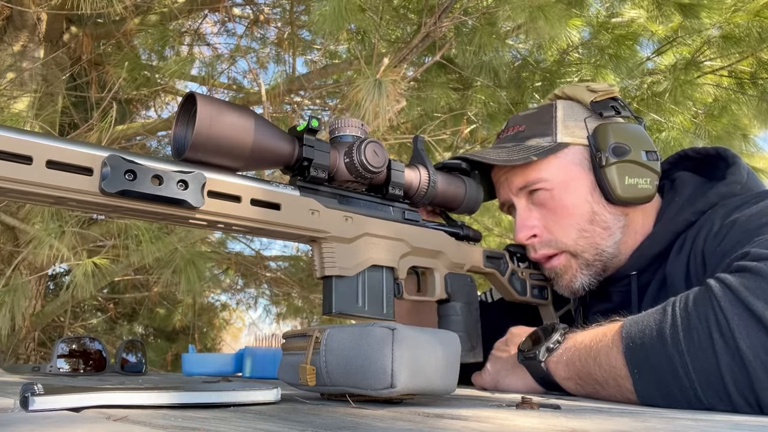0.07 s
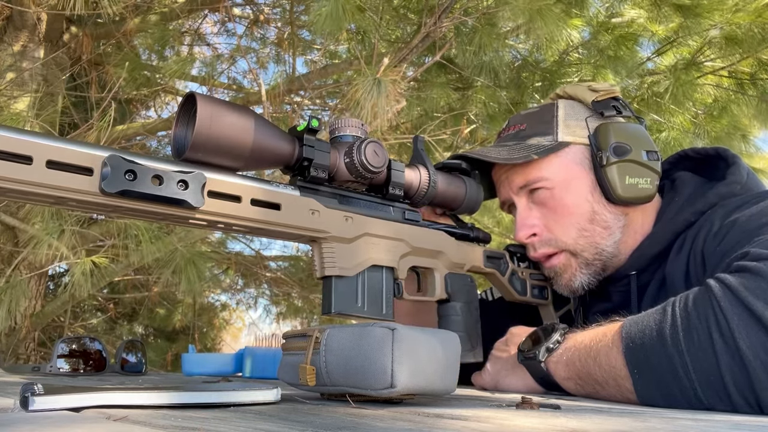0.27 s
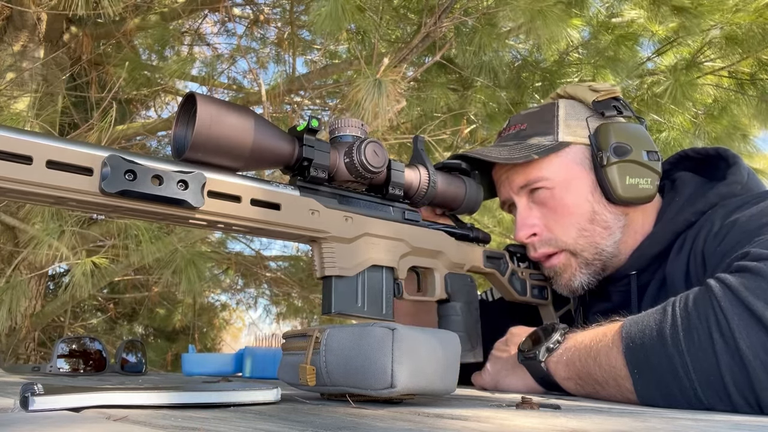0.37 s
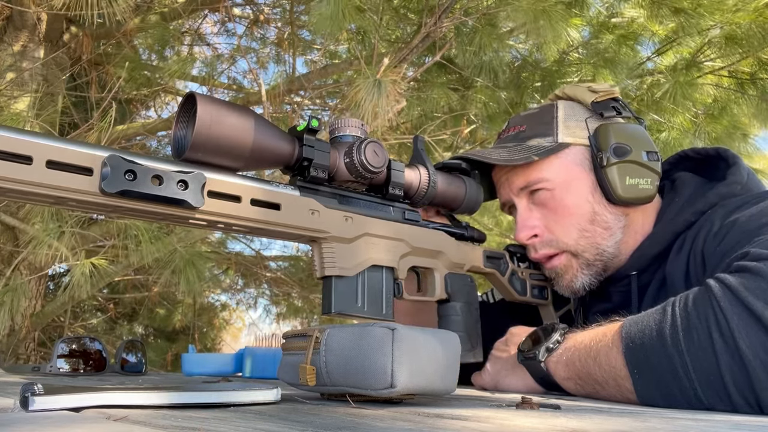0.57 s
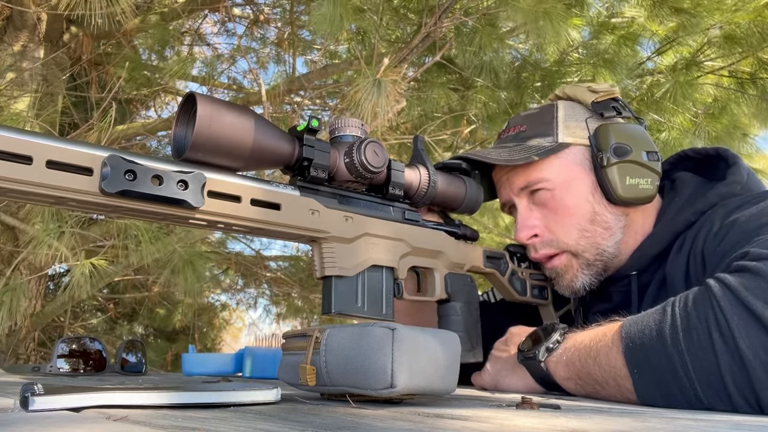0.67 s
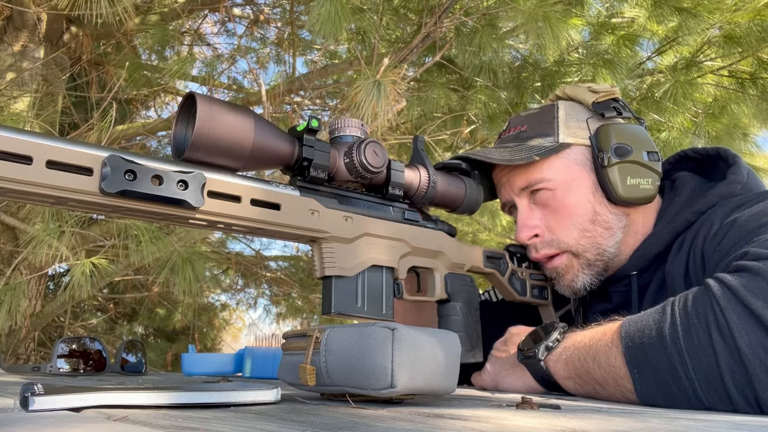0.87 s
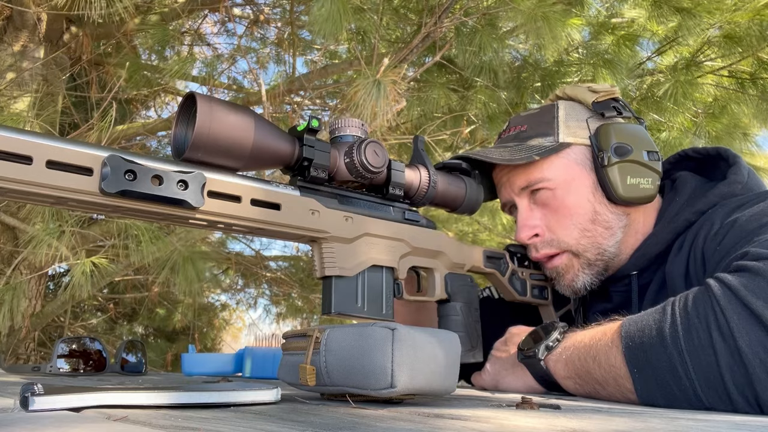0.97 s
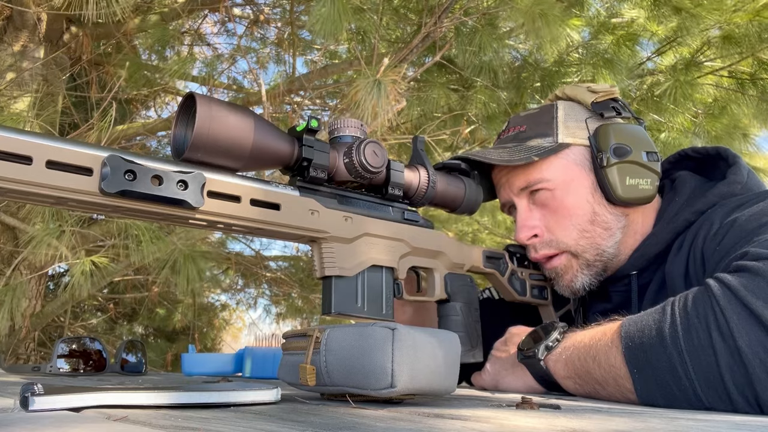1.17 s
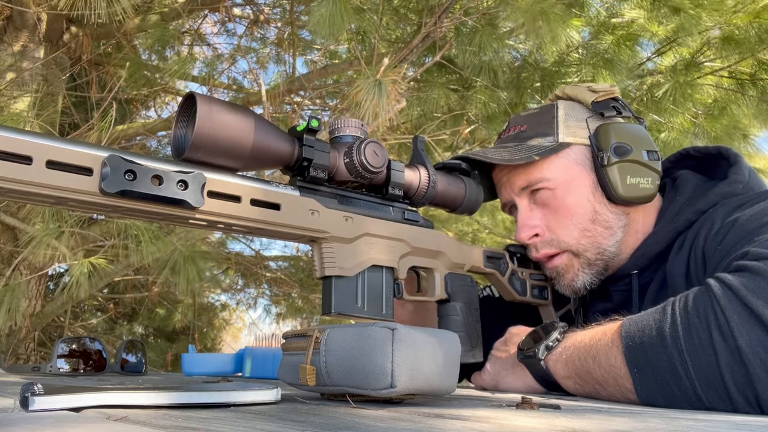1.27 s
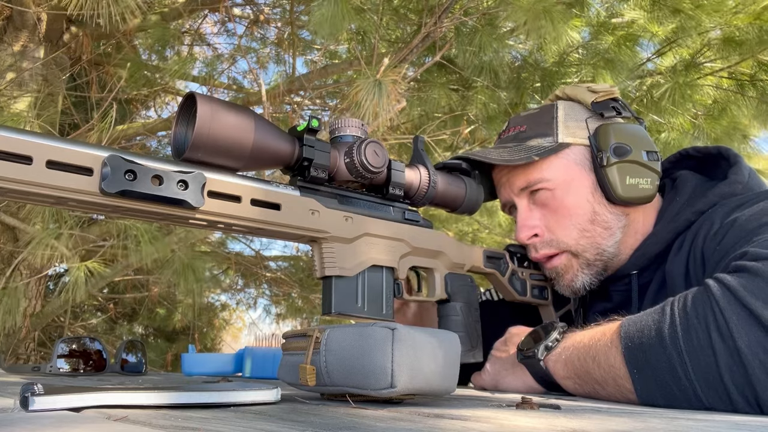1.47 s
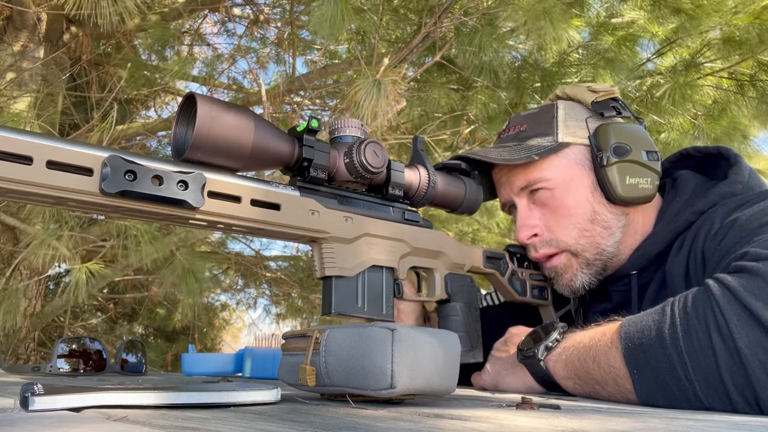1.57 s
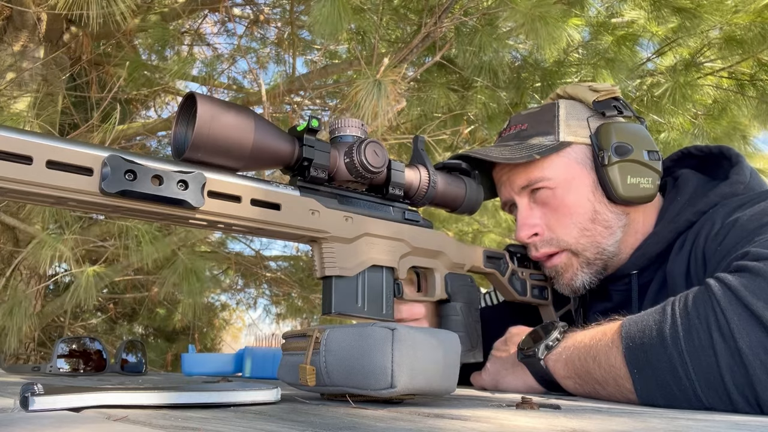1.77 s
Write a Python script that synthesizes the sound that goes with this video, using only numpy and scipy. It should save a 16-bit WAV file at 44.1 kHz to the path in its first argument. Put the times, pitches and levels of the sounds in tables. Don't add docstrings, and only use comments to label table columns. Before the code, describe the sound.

Rifle bolt action cycled up close: handle up, bolt back, pushed home, locked with a knock

```python
import sys
import numpy as np
from scipy import signal
from scipy.fft import rfft, irfft, next_fast_len
from scipy.io import wavfile

SR = 44100
rng = np.random.default_rng(int(sys.argv[2]) if len(sys.argv) > 2 else 0)


def volts_from_db(level):
    exponent = np.asarray(level, float) / 20
    return 10 ** exponent


def to_wav(s):
    ch = np.atleast_2d(s).T
    pcm = np.round(np.clip(ch, -1, 1) * 32767)
    wavfile.write(sys.argv[1], SR, pcm.astype(np.int16))


N = 81585

# time in seconds, stock peak in dB, steel peak in dB, flurry length in seconds, stock pitch in Hz.
LIFT_BLOWS = [
    (.122, -53, -73, 0.0018, 780),
    (.2165, -27.5, -13, 0.0027, 850),
    (.2215, -9.5, -6.5, 0.0044, 872),
]
CAM_BLOWS = [
    (.2655, -20, -8.5, 0.0047, 874),
    (.278, -22.5, -27, 0.0036, 911),
    (.337, -46.5, -47, 0.0009, 896),
]
DRAW_BLOWS = [
    (.532, -56.5, -69.5, 0.0035, 910),
    (.5965, -68, -39, 0.0037, 801),
    (.6325, -40, -18, 0.0059, 752),
    (.646, -32, -44, 0.0033, 798),
    (.684, -39.5, -61, 0.0013, 904),
    (.697, -43, -51, 0.0014, 930),
    (.767, -35.5, -41, 0.0025, 877),
]
STOP_BLOWS = [(.852, -20.5, -12.5, .003, 958), (.871, -19, -6, 0.0051, 952),
              (.881, -26.5, -13.5, 0.0041, 792), (.8895, -28.5, -19.5, 0.0052, 900),
              (.899, -36, -19, 0.003, 740), (.922, -56, -28, 0.0043, 800), (.941, -55, -29, .003, 880),
              (.952, -43.5, -23, .011, 763), (1.004, -55, -25.5, 0.0023, 844),
              (1.021, -31.5, -23.5, 0.0083, 829), (1.121, -45.5, -42.5, 0.0032, 866),
              (1.255, -50.5, -62, 0.0035, 800)]
PUSH_BLOWS = [
    (1.363, -42.5, -45.5, 0.0026, 780),
    (1.3745, -21.5, -6, 0.0032, 854),
    (1.387, -34.5, -34, 0.0044, 843),
    (1.396, -32.5, -38.5, .005, 786),
    (1.4245, -57, -17, 0.0034, 810),
]
LOCK_BLOWS = [
    (1.578, -17.5, -20, 0.00758, 883.6),
]
# pitch in Hz, level in dB, time to fall 60 dB in seconds.
LIFT_STEEL = [(1724, -11.5, 0.09), (2047, -13, 0.045), (3430, 1, 0.24), (3340, -1.5, 0.12),
              (3730, -5.5, 0.057), (5650, -10, 0.089), (6483, 0.5, 0.087), (10300, -11.5, 0.0067),
              (11900, -7.5, 0.032)]
# pitch in Hz, level in dB, time to fall 60 dB in seconds.
CAM_STEEL = [(1495, -2, 0.013), (1730, -7.5, .04), (2950, -3, 0.031), (3730, 0, 0.057), (5503, 4.5, 0.0067),
             (7000, 3.5, 0.0051), (9400, -7.5, 0.0083), (11650, 2.5, 0.015)]
# pitch in Hz, level in dB, time to fall 60 dB in seconds.
DRAW_STEEL = [(1474, -14, 0.0098), (1910, -17, 0.0051), (3300, -10, 0.051), (4040, -10.5, 0.04),
              (5000, -29, 0.02), (5780, 0.5, 0.046), (6230, -7, 0.15)]
# pitch in Hz, level in dB, time to fall 60 dB in seconds.
STOP_STEEL = [(1330, -13.5, 0.06), (1946, -5.5, .03), (2420, -24, .025), (3350, -3, 0.075),
              (3437, -0.5, 0.075), (4110, 2.5, 0.09), (5600, 2.5, 0.021), (7550, -3.5, 0.0043),
              (11020, -8, 0.0063)]
# pitch in Hz, level in dB, time to fall 60 dB in seconds.
PUSH_STEEL = [(1800, -2.5, .02), (3177, 7.5, 0.034), (4470, -21, 0.025), (5150, 5.5, 0.031),
              (6320, 8.5, 0.022), (6770, 6, 0.005), (9560, -5, .005), (11670, 1, 0.015)]
# pitch in Hz, level in dB, time to fall 60 dB in seconds.
LOCK_STEEL = [(1490, -20, 0.037), (2000, -13.5, 0.023), (3200, -1.5, 0.032), (4040, -0.5, 0.019),
              (5010, -2, .015), (6120, -6, 0.0092)]
# share of the blow's pitch, level in dB, time to fall 60 dB in seconds.
STOCK = [(.5, -24, .04), (.7, -14, .025), (.87, -9, .04), (1, 2, .06), (1.27, -14, .02)]
# frequency in Hz, level in dB per Hz.
CRACK = [(500, -38), (1200, -2.5), (3300, -4), (5500, 12), (8500, 1), (12000, -3.5), (14200, -15.5),
         (15600, -53)]
# start in seconds, level in dB, pitch
# in Hz, time to fall 60 dB in seconds.
RINGS = [(0.631, -10, 5780, 0.026), (1.373, -11, 3130, 0.012), (1.375, -19.5, 5350, 0.0089),
         (.218, -20.5, 3300, .03), (1.578, -28.5, 3200, 0.032), (.222, -25, 640, 0.023),
         (1.4253, -12, 3754, 0.0089), (1.4244, -28, 3200, 0.018), (.27, -50.5, 779, 0.43),
         (0.5945, -40.5, 1410, 0.027), (.697, -45.5, 1700, 0.013), (0.85, -15.5, 1300, 0.013),
         (.852, -25, 2000, 0.028), (0.87, -24, 2058, .03), (.875, -33.5, 580, 0.047),
         (1.374, -13, 1800, 0.012), (1.375, -28.5, 404, 0.09), (1.4242, -30, 1550, 0.0058),
         (1.578, -33.5, 409, 0.091), (.28, -41, 2920, 0.086), (0.771, -48.5, 1580, 0.05),
         (1.061, -65, 1295, 0.44),
         (.64, -44, 5830, .4),
    (1.378, -38, 2880, .12),
    (1.022, -52, 6200, .15),
    (.29, -46, 900, .25),
]
# start in seconds, end in seconds, level at start in dB, level at end in dB.
STROKES = [(0.191, 0.211, -62.5, -50), (0.221, 0.282, -40.5, -50), (0.261, 0.447, -42.5, -86.5),
           (0.48, 0.629, -89, -45.5), (0.64, 0.755, -55.5, -75.5), (0.755, 0.868, -62, -42.5),
           (0.854, 0.941, -33.5, -53), (0.932, 1.047, -45, -48), (1.009, 1.193, -51, -87.5),
           (1.338, 1.388, -76, -43), (1.369, 1.481, -42, -70.5), (1.468, 1.595, -66.5, -58),
           (1.561, 1.752, -54, -90), (1.785, 1.904, -84.5, -59.5)]
STROKE_CUT_HZ = [5000, 9000, 9020, 4550, 6960, 12000, 14000, 14000, 6720, 9040, 12000, 12400, 6950, 6190]
# frequency in Hz, level in dB per Hz.
SLIDE_COLOUR = [(200, -24.5), (400, -14), (800, 10), (1300, -4.5), (3300, -9.5), (6000, -5.5), (12000, -32),
                (15000, -26.5)]
# level in dB, time to fall 60 dB in seconds.
THUDS = [(-35.5, 0.36), (-22, 0.27), (-30, 0.22), (-30.5, 0.13), (-34.5, 0.215), (-39.5, 1), (-39.5, 0.23),
         (-27.5, 0.16), (-40, 0.6), (-28.5, 0.18), (-45, 0.18), (-36, 0.27), (-33.5, 0.416), (-35.5, 0.624),
         (-29.5, 0.24), (-38, 0.19), (-40.5, 0.18), (-38.5, 0.14), (-35.5, 0.027), (-42, 0.2),
         (-49.5, 0.21), (-46.5, 0.17), (-50.5, 0.17)]
THUD_S = [.23, .275, .268, .275, .38, .705, .72, .885, .84, 1.045, 1.05, 1.39, 1.39, 1.6, 1.585, 1.578,
          1.67, .32, .7, .95, 1.055, 1.61, .54]
THUD_HZ = [95, 101, 360, 160, 50, 97, 60, 100, 66, 66, 185, 186, 66, 62, 110, 200, 56, 300, 270, 330, 370,
           290, 330]
# start in seconds, length in seconds, level in dB, start pitch in Hz, fall in Hz.
WHISTLES = [
    (0, .03, -68, 2680, 250),
    (0, .15, -75, 2470, 10),
    (.44, .14, -76, 2460, 10),
    (.675, .04, -66, 2380, 10),
    (1.76, .11, -72, 3060, 1300),
]
# frequency in Hz, level in dB per Hz.
AIR = [(30, -26.5), (55, -8), (120, 0), (250, -20), (600, -29), (1300, -28.5), (2000, -40), (15000, -63.5)]

STAGES = [(LIFT_BLOWS, LIFT_STEEL), (CAM_BLOWS, CAM_STEEL), (DRAW_BLOWS, DRAW_STEEL),
          (STOP_BLOWS, STOP_STEEL), (PUSH_BLOWS, PUSH_STEEL), (LOCK_BLOWS, LOCK_STEEL)]
RISE_SHARE, CONTACTS_PER_S = 0.31, 6100
STRIKE_SPREAD_DB, STRIKE_DETUNE = 3, .008
GRIP_T60_S, GRIP_LEAVES_DB = .017, -13
TAIL_DB, TAIL_T60_S, TAIL_CUT_HZ = -19.5, 0.076, 6500
FAINT_CUT_HZ, CUT_DB_PER_OCTAVE = 2900, 10
STOCK_SWELL, STOCK_ROUGH = 0.58, .12
RUB_RING_DB, RUB_PER_S, JUDDER_DB = -2, 3100, 3.5
THUD_RISE_CYCLES, THUD_SIDE_DB, THUD_SAG, THUD_ROUGH = 0.73, -0.5, 0.022, .6
OVERTONE_DB, FALL_POWER = -17, 2.7
AIR_DB, GUST_DB, AIR_ALIKE = -57, 2, .5
PORT_LAG_S, PAN_DB, DIFFUSE_DB = 7e-5, 0.4, -8
RUMBLE_CUT_HZ, CUTOFF_HZ, TOP = 36, 16300, .88
OPPOSITE = np.array([[1], [-1]])


def rms_one(x):
    return x / np.sqrt(np.mean(x ** 2) + 1e-30)


def peak_one(x):
    return x / (np.max(np.abs(x)) + 1e-30)


def colour(x, points):
    hz, db = np.transpose(points)
    grid = np.log(np.arange(1, 514) * SR / 1026)
    ceps = irfft(np.interp(grid, np.log(hz), db) * np.log(10) / 20)
    ceps[1:512] *= 2
    ceps[513:] = 0
    response = irfft(np.exp(rfft(ceps)))
    response = response.reshape((1,) * (x.ndim - 1) + (-1,))
    return signal.fftconvolve(x, response, axes=-1)[..., :x.shape[-1]]


def ring(x, hz, t60):
    r = volts_from_db(-60 / (max(t60, .004) * SR))
    w = 2 * np.pi * hz / SR
    return signal.lfilter([0, np.sin(w)], [1, -2 * r * np.cos(w), r * r], x + 1e-18)


def body(x, modes, longest):
    out = np.zeros(len(x))
    for hz, db, t60 in modes:
        louder, sharper = rng.standard_normal(2)
        tone = ring(x, hz * (1 + STRIKE_DETUNE * sharper), min(t60, longest))
        out += volts_from_db(db + STRIKE_SPREAD_DB * louder) * peak_one(tone)
    return out


def stock_modes(pitch_hz):
    return [(share * pitch_hz, db, t60) for share, db, t60 in STOCK]


def grit(size, per_s, spread_db):
    chance, luck = rng.random((2, size))
    height = volts_from_db(-spread_db * np.log(np.maximum(luck, .02)))
    return (chance < per_s / SR) * height * rng.choice([-1, 1], size)


def add(out, s, x):
    i = int(s * SR)
    out[..., i:i + x.shape[-1]] += x[..., :out.shape[-1] - i]


def blow(steel, stock_db, bright_db, flurry, hz):
    t = np.arange(SR // 4) / SR
    rise = RISE_SHARE * flurry
    shape = np.where(t < rise, (t / rise) ** 0.97, np.exp(-(t - rise) / flurry * 1.5))
    hits = shape * (grit(len(t), CONTACTS_PER_S, 2.2) + .5 * rng.standard_normal(len(t)))
    choke = volts_from_db(-60 * np.maximum(t - rise - flurry, 0) / GRIP_T60_S) + volts_from_db(GRIP_LEAVES_DB)

    r = np.exp(-2 * np.pi * TAIL_CUT_HZ / SR)
    rattle = signal.lfilter([1 - r], [1, -r], rng.standard_normal(len(t)))
    tail = np.minimum(t / rise, 1) * volts_from_db(TAIL_DB - 60 * t / TAIL_T60_S) * rattle
    crack = peak_one(colour(peak_one(hits * shape) + tail, CRACK))
    bright = volts_from_db(-4) * peak_one(choke * body(hits, steel, .03)) + volts_from_db(-2) * crack

    cut_hz = min(FAINT_CUT_HZ * 2 ** ((bright_db + 48) / CUT_DB_PER_OCTAVE), .45 * SR)
    bright = signal.lfilter(*signal.butter(2, max(cut_hz, 1500), fs=SR), bright)

    swell = np.sin(np.pi / 2 * np.minimum(t / (rise + STOCK_SWELL * flurry), 1)) ** 2
    knock = np.r_[1., t[1:] * 0] + STOCK_ROUGH * peak_one(hits)
    stock = swell * choke * body(knock, stock_modes(hz), .08)
    return volts_from_db(bright_db) * bright + volts_from_db(stock_db) * peak_one(stock)


def blows():
    out = np.zeros(N)
    for rows, steel in STAGES:
        for s, stock_db, bright_db, flurry, hz in rows:
            add(out, s - RISE_SHARE * flurry, blow(steel, stock_db, bright_db, flurry, hz))
    out = signal.sosfilt(signal.butter(3, 420, "high", fs=SR, output="sos"), out)

    t = np.arange(SR // 4) / SR
    click = np.r_[1., t[1:] * 0]
    for s, db, hz, t60 in RINGS:
        add(out, s, volts_from_db(db) * ring(click, hz, t60) * np.minimum(t / 0.0019, 1))
    return out


def slide():
    t = np.arange(N) / SR
    points = N // 150 + 2
    judder = np.interp(np.arange(N) / 150, np.arange(points), rng.standard_normal(points))
    rub = grit(N, RUB_PER_S, 3.5) + .8 * rng.standard_normal(N)
    rub = rub * volts_from_db(JUDDER_DB * judder)
    steel = rms_one(body(rub, STOP_STEEL, .007))
    stock = rms_one(body(rub, stock_modes(850), .03))
    sound = rms_one(colour(rub, SLIDE_COLOUR)) + volts_from_db(RUB_RING_DB) * (.5 * steel + stock)

    out = np.zeros(N)
    for (start, end, db_start, db_end), cut_hz in zip(STROKES, STROKE_CUT_HZ):
        fade = np.clip(np.minimum(t - start, end - t) / .008, 0, 1)
        press = volts_from_db(np.interp(t, [start, end], [db_start, db_end])) * fade
        out += press * signal.lfilter(*signal.butter(2, cut_hz, fs=SR), sound)
    return out


def bench():
    out, t = np.zeros((2, N)), np.arange(SR // 2) / SR
    for s, hz, (db, t60) in zip(THUD_S, THUD_HZ, THUDS):
        a, b = rng.uniform(0, 2 * np.pi, 2)
        shape = volts_from_db(db - 60 * t / t60) * (1 - np.exp(-(t * hz / THUD_RISE_CYCLES) ** 2))
        rough = THUD_ROUGH * rng.standard_normal((2, 200))
        wobble = [np.interp(t * hz / 2, np.arange(200), v) for v in rough]
        w = 2 * np.pi * hz * np.cumsum(1 - THUD_SAG * t / t60 * 2) / SR
        shared = np.sin(w + a + wobble[0])
        side = volts_from_db(THUD_SIDE_DB) * np.sin(1.15 * w + b + wobble[1])
        add(out, s, shape * (shared + side * OPPOSITE))
    return out


def birds():
    out = np.zeros(N)
    for s, length, db, hz, fall_hz in WHISTLES:
        u = np.arange(int(length * SR)) / (length * SR)
        w = 2 * np.pi * np.cumsum(hz - fall_hz * u ** FALL_POWER) / SR
        tone = np.sin(w) + volts_from_db(OVERTONE_DB) * np.sin(2 * w)
        add(out, s, volts_from_db(db) * np.sin(np.pi * u) ** 0.057 * tone)
    return out


def air():
    mid, side = rms_one(colour(rng.standard_normal((2, N + 2000)), AIR)[:, 2000:])
    gust = signal.lfilter([1], [1, -1.6, .64], rng.standard_normal(N // 400 + 60))
    gust = rms_one(gust[50:])
    gust = np.interp(np.arange(N) / 400, np.arange(len(gust)), gust)
    noise = np.sqrt(1 + AIR_ALIKE) * mid + np.sqrt(1 - AIR_ALIKE) * side * OPPOSITE
    return volts_from_db(AIR_DB + GUST_DB * gust) * noise


def ports(x):
    size = next_fast_len(N + 4096)
    turns = np.arange(size // 2 + 1) / size * SR * PORT_LAG_S
    late = irfft(rfft(x, size) * np.exp(-2j * np.pi * turns), size)[:N]
    direct = np.array([x * volts_from_db(PAN_DB), late * volts_from_db(-PAN_DB)])

    t = np.arange(SR // 20) / SR
    scatter = rng.standard_normal((2, len(t))) * volts_from_db(-60 * t / 0.038) * (t > .001)
    scatter = signal.lfilter(*signal.butter(1, 1200, "high", fs=SR), scatter)
    scatter = scatter / np.sqrt(np.sum(scatter ** 2) / 2)
    return direct + volts_from_db(DIFFUSE_DB) * signal.fftconvolve(x[None], scatter, axes=1)[:, :N]


def scene():
    rifle = blows() + slide()
    return volts_from_db(5.5) * ports(rifle) + bench() + birds() + air()


def low_pass(x):
    return signal.sosfilt(signal.butter(12, 16540, fs=SR, output="sos"), x)


def record(dry):
    steady = signal.lfilter(*signal.butter(2, RUMBLE_CUT_HZ, "high", fs=SR), dry)
    rounded = TOP * np.tanh(steady / TOP)
    mix = signal.sosfilt(signal.cheby2(10, 60, CUTOFF_HZ, fs=SR, output="sos"), rounded)
    return low_pass(mix)


dry = scene()
out = record(dry)
to_wav(out)
```